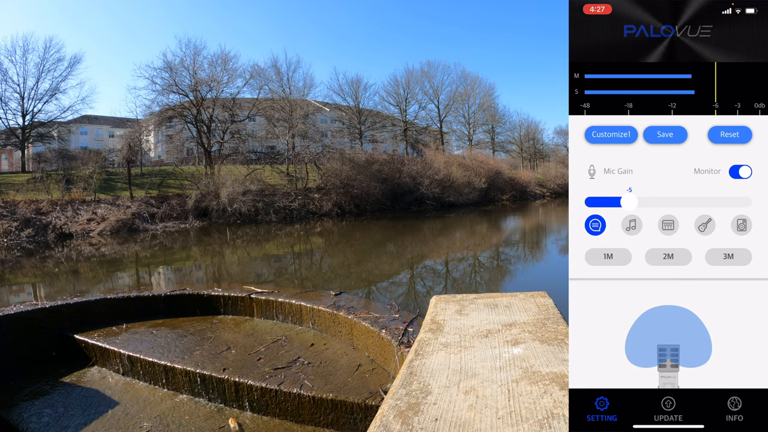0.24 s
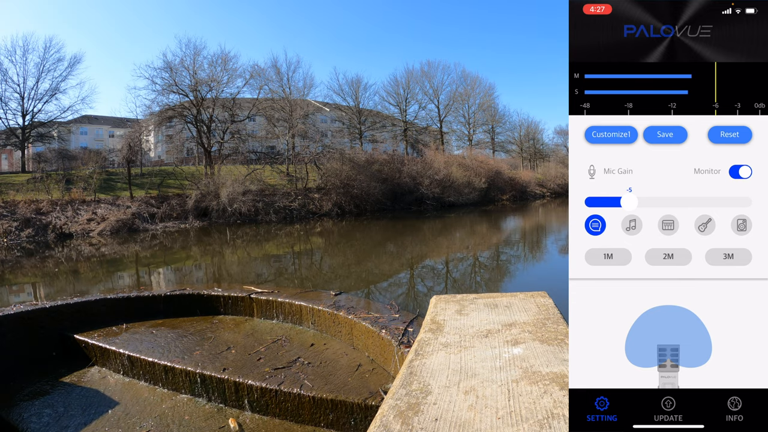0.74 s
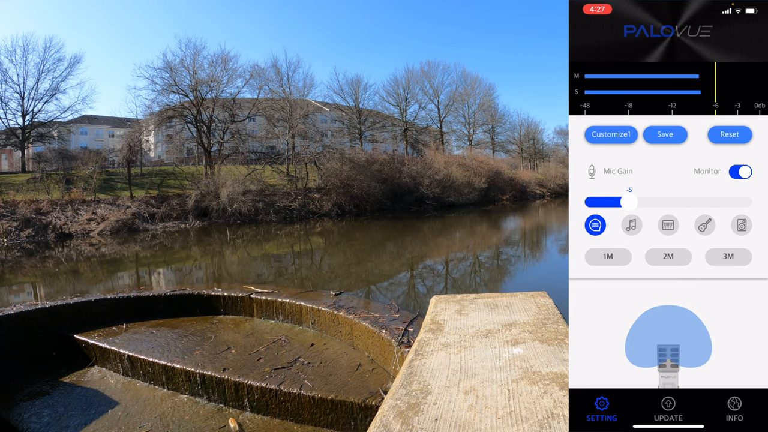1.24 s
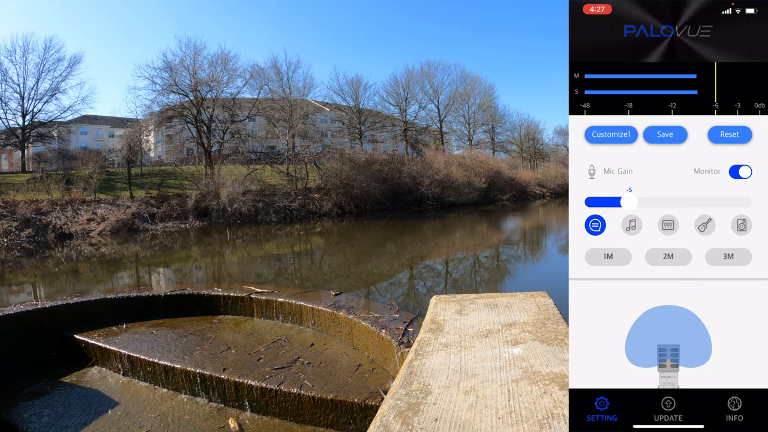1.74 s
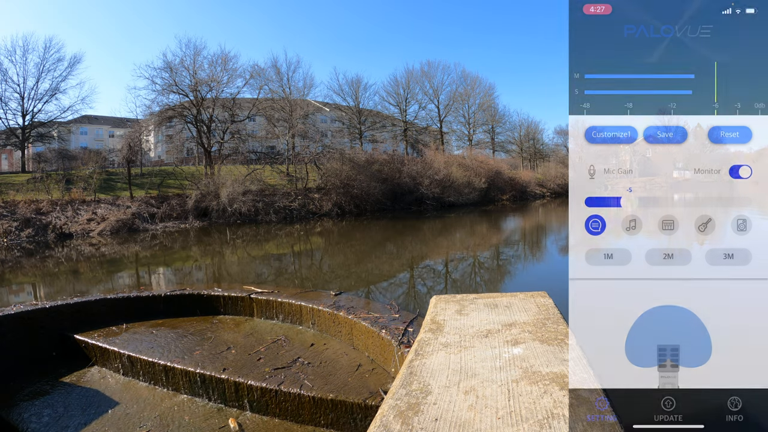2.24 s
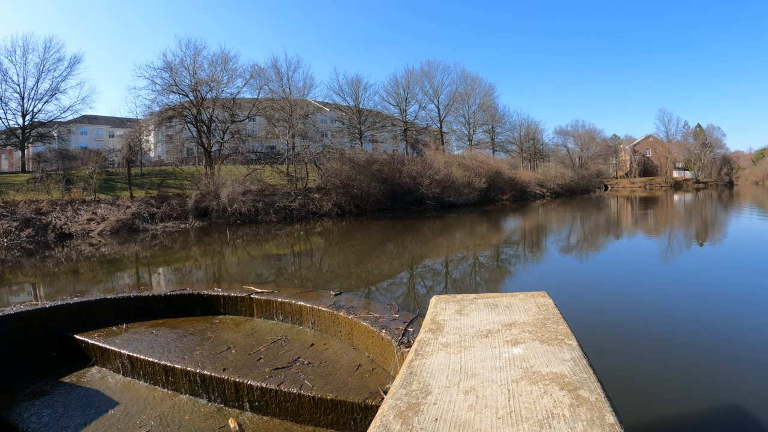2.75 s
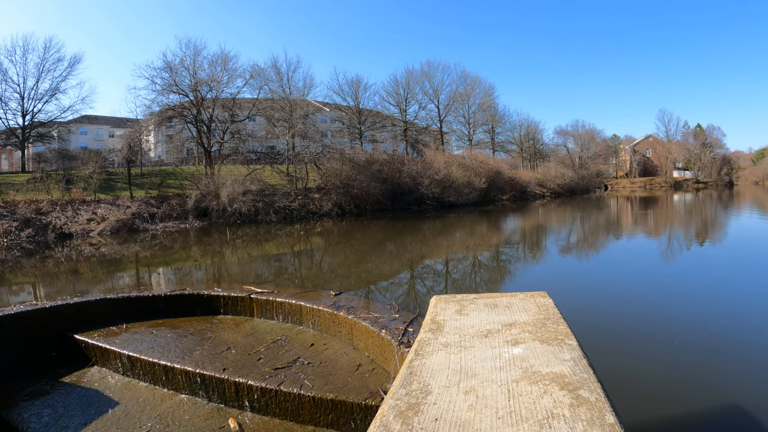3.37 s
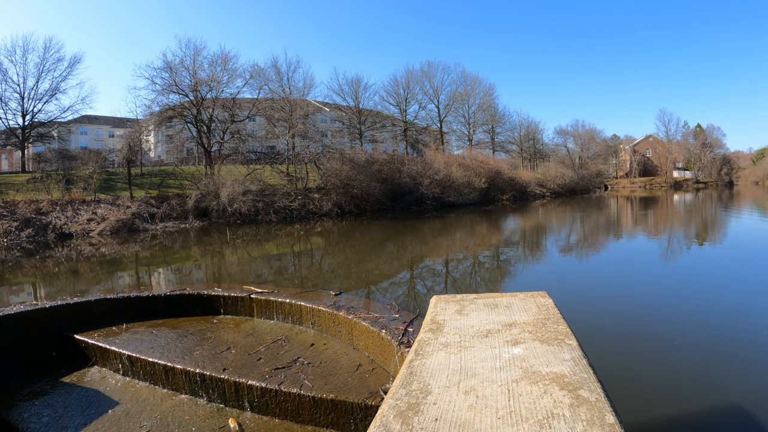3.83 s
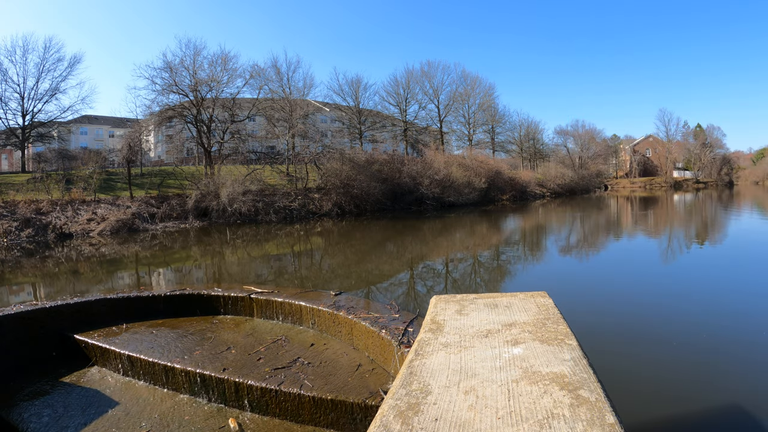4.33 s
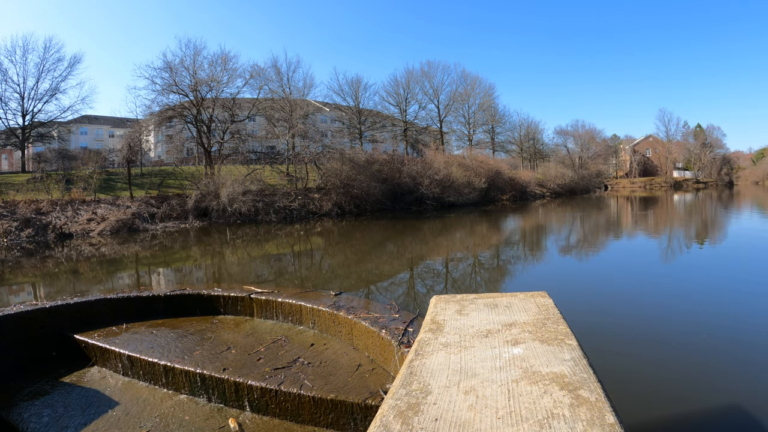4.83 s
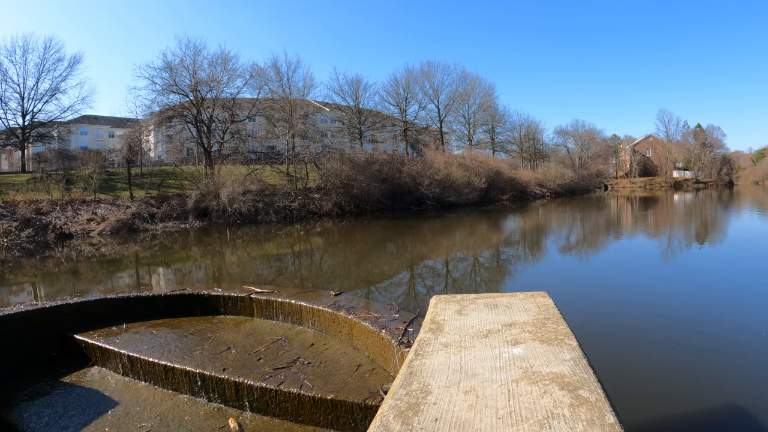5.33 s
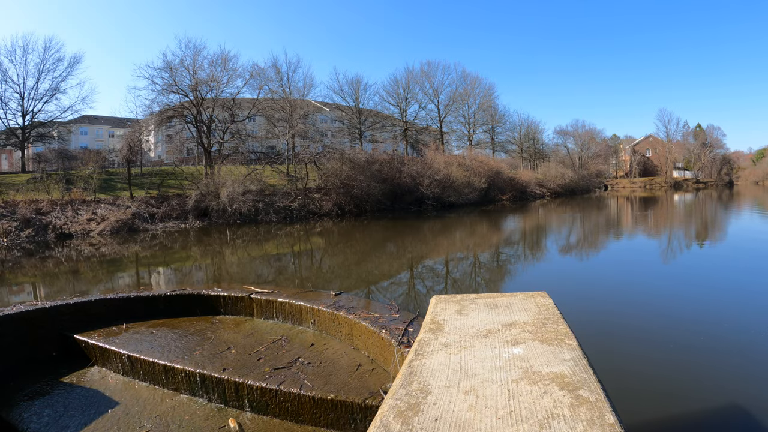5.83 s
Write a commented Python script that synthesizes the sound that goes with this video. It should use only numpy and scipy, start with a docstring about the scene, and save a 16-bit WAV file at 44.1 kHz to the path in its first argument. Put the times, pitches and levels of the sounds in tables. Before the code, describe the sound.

Outdoors by still water, a thin sheet spills continuously over a low concrete weir. The rush is soft, even and slightly hollow, with fine gurgles, spray and small plinks. Sharp little drops tick close by at irregular moments. A faint low breeze presses on the microphone, then freshens after about two seconds into deep rumbling gusts with a few dull thumps.

```python
"""A thin sheet of water spills over a small concrete weir: shaped noise for the rush, damped sines for
bubbles and spray, with dribbles, splashes and a few near drops made of clicks and short noise bursts.
A breeze of low noise buffets the microphone and freshens after two seconds, with a few thumping puffs.
A faint fluttering noise, unrelated between left and right, lies under everything.
The left channel comes a little later than the right, which makes the rush hollow."""
import sys
import numpy as np
from scipy import signal
from scipy.fft import rfft, irfft, next_fast_len
from scipy.io import wavfile
from scipy.ndimage import uniform_filter1d, map_coordinates

SR = 44100
rng = np.random.default_rng(int(sys.argv[2]) if len(sys.argv) > 2 else 0)


def materialize(psi):
    """Save the field psi as 16-bit PCM at rate SR to the path in sys.argv[1].

    A 1-D psi becomes a single channel; in a 2-D psi each row is a channel.
    """
    bounded = np.clip(np.atleast_2d(psi).T, -1, 1)
    quanta = np.round(bounded * 32767).astype(np.int16)
    wavfile.write(sys.argv[1], SR, quanta)


N = 269010  # length in samples

# faint noise unrelated between left and right, relative spectrum: pitch_hz, level_db
FLOOR_SPECTRUM = [(100, 13.5), (400, 7.5), (1000, -22.0), (3500, -1), (7000, -5), (15000, -23)]
# breeze at the microphone, before the layer gains: start_s, lump_level_db, eddy_level_db, flap_level_db
BREEZE_LEVELS = [(0, -44, -71, -74), (.45, -44.5, -56, -69), (.62, -46, -57, -73), (.85, -41.5, -58.5, -67),
                 (1.25, -44.5, -52.5, -81), (1.7, -46, -69.5, -70), (2.06, -44, -50.5, -73),
                 (2.15, -34.5, -49, -82), (2.33, -40, -37.5, -61), (2.62, -37, -42.5, -65),
                 (2.87, -45.5, -49.5, -61.5), (3.1, -34, -54, -66), (3.3, -39, -43, -53.5),
                 (3.47, -40, -47, -65), (3.68, -39, -45.5, -56.5), (4.07, -35, -47.5, -59),
                 (4.3, -42.5, -47, -57.5), (4.6, -31, -41.5, -52), (4.73, -34, -51, -49.5),
                 (4.87, -35.5, -43.5, -72), (5.12, -39, -49, -84), (5.38, -35, -52, -56.5),
                 (5.55, -36.5, -45.5, -61.5), (5.78, -36, -39.5, -55), (5.92, -33, -42, -78),
                 (6.1, -31, -54, -63)]
# slow lumps of wind pressure, relative spectrum: pitch_hz, level_db (per Hz)
LUMP_SPECTRUM = [(3, -3), (10, -1.5), (20, -2), (34, -4.5), (50, -17.5), (70, -30), (120, -43.5),
                 (300, -100)]
# faster eddies, relative spectrum: pitch_hz, level_db (per Hz)
EDDY_SPECTRUM = [(30, -13), (55, 7), (76, 3.5), (98, -7), (125, -17), (200, -36), (300, -52), (600, -75),
                 (2000, -110)]
# smallest eddies, a soft flapping above the rumble, relative spectrum: pitch_hz, level_db (per Hz)
FLAP_SPECTRUM = [(60, -19), (105, 2), (130, 1.5), (165, -6), (215, -14.5), (320, -35), (600, -44),
                 (2000, -90)]
# single puffs that thump the microphone: centre_s, peak_db, pitch_hz, direction (1 push, -1 pull)
WIND_PUFFS = [(2.143, -21, 23.6, -1), (2.309, -27.5, 35, 1), (2.434, -30, 47, -1), (2.623, -22.5, 31, 1),
              (3.733, -20, 24, 1), (4.571, -24.5, 27, 1), (4.603, -20, 23, -1), (4.693, -26, 15, 1),
              (5.211, -23.5, 22.6, -1), (5.357, -22.5, 17, -1), (5.457, -22, 21, -1), (5.636, -23, 33, -1),
              (5.75, -20.5, 26, 1)]
# clumps of water plunging into the pool: centre_s, level_db (before gain), pitch_hz, length_s
PLUNGES = [(0.162, -51.5, 3400, 0.008), (0.58, -56.5, 570, 0.016), (0.76, -49.5, 2050, 0.01),
           (0.83, -53, 3950, 0.006), (1.878, -51.5, 2750, 0.012), (3.23, -49, 2750, 0.005),
           (3.381, -49.5, 2570, 0.0045), (3.689, -57.5, 755, 0.022), (3.732, -48, 1540, 0.0056),
           (4.327, -54, 1150, 0.022), (4.964, -55.5, 1470, 0.078)]
# near drops hitting the concrete: start_s, level_db (before the tone curve), pitch_hz
NEAR_DROPS = [(0.0628, -41, 10200), (0.2424, -34, 6000), (0.7085, -36.5, 7200), (1.0, -43, 9000),
              (1.0079, -42, 6800), (2.234, -43, 9800), (2.369, -32, 6700), (2.5323, -38, 6800),
              (3.137, -44, 11000), (3.553, -42, 7200), (3.8418, -36, 8300), (4.601, -41, 9100),
              (5.1604, -34.5, 11500)]
# tone curve of the near drops: pitch_hz, gain_db
DROP_TONE = [(1000, -14), (3000, -1), (7500, 1), (10000, -2), (13500, -5), (15700, -14)]
# falling water, relative spectrum: pitch_hz, level_db (per Hz)
WATER_SPECTRUM = [(60, -2.5), (130, -2), (190, 1.5), (262, 0.5), (320, -8.5), (400, -10), (520, -5.5),
                  (700, -6), (900, -3.5), (1400, -3.5), (3000, -5), (6000, -7), (8000, -13.5), (10500, -16),
                  (14200, -24.5), (15500, -39)]
# unevenness of the rush: pitch_hz, depth_db
RUSH_PATCHES = [(300, 1.66), (2000, 0.66), (10000, 2.13)]
# part of the water's power that leans to the other side: pitch_hz, share (of 1)
SIDE_SHARE = [(150, .005), (1000, .025), (2000, .05), (4000, .11), (8000, .23), (14000, .3)]

FLOOR_DB, SPILL_DB, PLINK_DB, FLECK_DB = -76.5, -50.0, -63.5, -62  # layer levels, dB
LUMP_GAIN_DB, EDDY_GAIN_DB, FLAP_GAIN_DB = 4, 1.5, 4
FLUTTER_DB, FLUTTER_RATE = 2, 14  # chance swings of each wind layer: depth in dB, knots a second
SPLASH_GAIN_DB = 1.5
DROP_WIDTH, DROP_T60_S = .34, .007  # a drop's burst: band width (log pitch), time to fall 60 dB
SPATTER_DB, SPATTER_T60_S = -14, .035  # its spatter: level against the burst, time to fall 60 dB
LEFT_LAG_S = 1 / 750
TOP_HZ = 15730


def amp(db):
    """Decibels to gain."""
    return 10 ** (np.asarray(db) / 20)


def unit(x):
    """x at rms 1."""
    return x / np.sqrt(np.mean(x ** 2) + 1e-20)


def along(points, hz):
    """(Hz, value) points read on a log axis."""
    f, v = np.transpose(points)
    return np.interp(np.log(hz + 1), np.log(f + 1), v)


def curves(rows):
    """One value per sample for each column after the time."""
    s, *cols = np.transpose(rows)
    return [np.interp(np.arange(N) / SR, s, c) for c in cols]


def wobble(rate):
    """A smooth random curve, rate knots a second."""
    knots = rng.standard_normal(int(N * rate / SR) + 4)
    return map_coordinates(knots, [np.arange(N) * rate / SR])


def filtered(x, response):
    """x times a complex response of frequency."""
    m = next_fast_len(N + SR // 2)
    hz = np.fft.rfftfreq(m, 1 / SR)
    return irfft(rfft(x, m) * response(hz), m)[..., :N]


def coloured(x, spectrum):
    """x given a spectrum, at rms 1."""
    return unit(filtered(x, lambda hz: amp(along(spectrum, hz))))


def patchy(x, depth, bins_size, frames_size):
    """x with random gain patches in time and frequency; depth is (Hz, dB)."""
    hz, _, z = signal.stft(x, SR, nperseg=512)
    field = uniform_filter1d(rng.standard_normal(z.shape), bins_size, 0)
    field = uniform_filter1d(field, frames_size, 1)
    gain = amp(along(depth, hz)[:, None] * unit(field))
    gain /= np.sqrt(np.mean(gain ** 2, axis=1, keepdims=True))  # each band's gain at rms 1
    return signal.istft(z * gain, nperseg=512)[1][:N]


def bubbles(count, low_hz, high_hz, cycles, scatter_db, rise, size):
    """A cloud of damped sines at rms 1; with rise, each climbs in pitch as its bubble nears the surface."""
    when, pitch, life, strength = rng.random((count, 4)).T[:, :, None]
    hz = low_hz * (high_hz / low_hz) ** pitch
    turns = hz * np.arange(size) / SR
    age = turns / (cycles * (.5 + life))
    phase = 2 * np.pi * turns * (1 + rise * np.minimum(age, 2) / 2)
    ring = np.sin(phase) * np.exp(-age)
    # small bubbles die sooner, so they are stronger to carry the same power per Hz
    gain = hz * amp(-scatter_db * np.log(strength + .01))
    index = (when * N).astype(int) + np.arange(size)
    return unit(np.bincount(index.ravel(), (gain * ring).ravel(), N)[:N])


def left_late(x):
    """The stereo pair (x delayed, x)."""
    late = filtered(x, lambda hz: np.exp(-2j * np.pi * hz * LEFT_LAG_S))
    return np.array([late, x])


def faint_floor():
    """A faint noise, unrelated between left and right, that swells and fades at random."""
    noise = amp(3 * wobble(12)) * rng.standard_normal((2, N))
    return amp(FLOOR_DB) * coloured(noise, FLOOR_SPECTRUM)


def wind():
    """The breeze presses slow lumps on the microphone; gusts add faster eddies and a soft flapping."""
    lump_db, eddy_db, flap_db = curves(BREEZE_LEVELS)
    layers = [(LUMP_SPECTRUM, lump_db + LUMP_GAIN_DB),
              (EDDY_SPECTRUM, eddy_db + EDDY_GAIN_DB),
              (FLAP_SPECTRUM, flap_db + FLAP_GAIN_DB)]
    out = np.zeros(N)
    for spectrum, level_db in layers:
        air = coloured(rng.standard_normal(N), spectrum)
        # turbulence keeps an even strength within one gust
        power = uniform_filter1d(uniform_filter1d(air ** 2, size=3500), size=2500)
        even_air = air / (np.sqrt(np.abs(power)) + 0.013)
        out += amp(level_db + FLUTTER_DB * wobble(FLUTTER_RATE)) * even_air
    return out


def puffs():
    """A vortex passing the microphone makes one push or pull between two soft swings the other way."""
    t, out = np.arange(N) / SR, np.zeros(N)
    for centre_s, peak_db, pitch_hz, direction in WIND_PUFFS:
        u = (np.pi * pitch_hz * (t - centre_s)) ** 2
        out += np.sign(direction) * amp(peak_db) * (1 - 2 * u) * np.exp(-u)
    return out


def trickle():
    """Dribbles off the lip plink into the pool as small rising bubbles, or fleck the wet concrete."""
    plinks = bubbles(count=260, low_hz=900, high_hz=5200, cycles=12, scatter_db=2.2, rise=0.08, size=1600)
    flecks = bubbles(count=700, low_hz=1400, high_hz=8000, cycles=1.8, scatter_db=1.9, rise=0, size=400)
    plinks = amp(PLINK_DB) * coloured(plinks, WATER_SPECTRUM)
    return plinks + amp(FLECK_DB) * coloured(flecks, WATER_SPECTRUM)


def splashes():
    """Each clump of water throws up a swarm of like-sized bubbles, heard as a brief band of noise."""
    t, out = np.arange(N) / SR, np.zeros(N)
    for centre_s, level_db, pitch_hz, length_s in PLUNGES:
        band = lambda hz: np.exp(-(np.log((hz + 1) / pitch_hz) / 0.3) ** 2)
        swarm = unit(filtered(rng.standard_normal(N), band))
        swell = np.exp(-((t - centre_s) / length_s) ** 2)
        out += amp(level_db + SPLASH_GAIN_DB) * swarm * swell
    return out


def drops():
    """A near drop snaps, bursts in a broad band round its pitch and scatters a short spatter."""
    t, out = np.arange(SR // 25) / SR, np.zeros(N + SR)
    hz = np.fft.rfftfreq(len(t), 1 / SR)
    burst_decay = amp(-60 * t / DROP_T60_S)
    spatter_decay = amp(SPATTER_DB - 60 * t / SPATTER_T60_S)
    for start_s, level_db, pitch_hz in NEAR_DROPS:
        band = np.exp(-(np.log((hz + 1) / pitch_hz) / DROP_WIDTH) ** 2)
        random_phase = np.exp(2j * np.pi * rng.random(len(hz)))
        fizz = unit(irfft(band * random_phase, len(t)))
        # a one-sample click with a little dying noise
        snap = (t == 0) + .2 * rng.standard_normal(len(t)) * burst_decay
        burst = .55 * fizz * (burst_decay + spatter_decay)
        out[round(start_s * SR):][:len(t)] += amp(level_db) * (snap + burst)
    return filtered(out[:N], lambda hz: amp(along(DROP_TONE, hz)))


def spill():
    """Countless far impacts merge into a rush; nearer bubbles and spray stand out of it."""
    rush = patchy(unit(rng.standard_normal(N)), RUSH_PATCHES, bins_size=14, frames_size=7)
    gurgle = bubbles(count=2600, low_hz=477.5, high_hz=6520, cycles=8.6,
                     scatter_db=2.5, rise=0.052, size=1200)
    spray = bubbles(count=9000, low_hz=2240, high_hz=15800, cycles=0.97, scatter_db=2.5, rise=0, size=100)
    spray = unit(spray * amp(2.15 * wobble(22)))  # spray comes off the lip in flurries
    surge = amp(0.37 * wobble(11) + 0.29 * wobble(45))  # the falling sheet tears unevenly
    water = surge * (rush + amp(-14.5) * gurgle + amp(-6.5) * spray)
    return amp(SPILL_DB) * coloured(water, WATER_SPECTRUM)


def scene():
    """The right channel leads; a share of the water, mostly treble, leads on the left and widens the hiss."""
    share = lambda hz: np.clip(along(SIDE_SHARE, hz), 0, .5)
    main = filtered(spill(), lambda hz: np.sqrt(1 - share(hz)))
    wide = filtered(spill(), lambda hz: np.sqrt(share(hz)))
    right_first = main + trickle() + splashes() + drops() + wind() + puffs()
    left_first = left_late(wide)[::-1]  # channels swapped
    return left_late(right_first) + left_first + faint_floor()


def record(dry):
    """The recorder keeps nothing above its band limit."""
    return filtered(dry, lambda hz: hz < TOP_HZ)


dry = scene()
out = record(dry)
materialize(out)
```